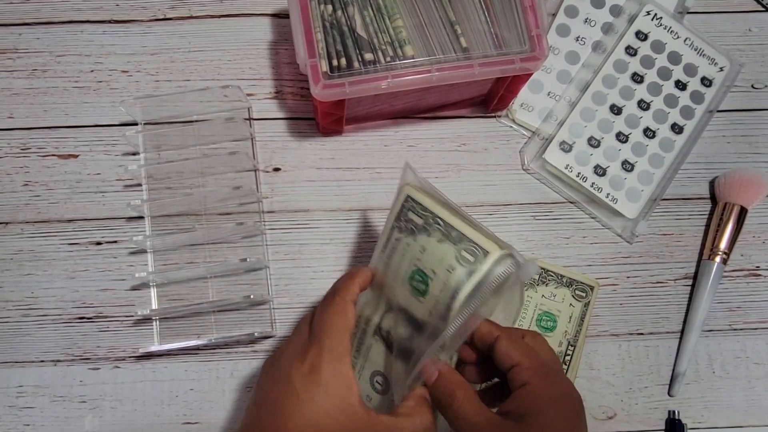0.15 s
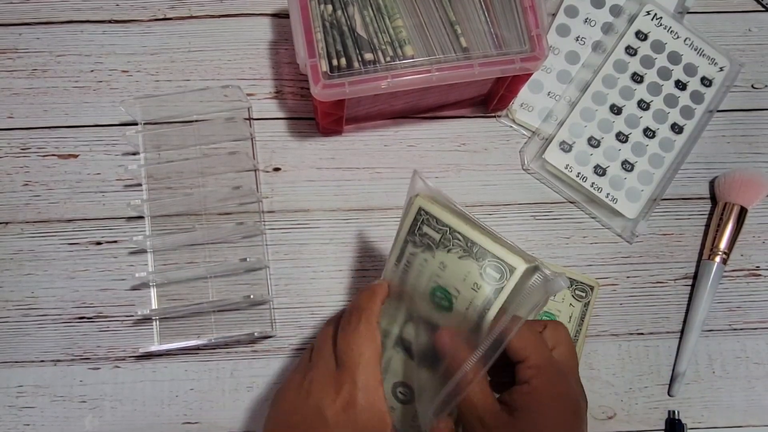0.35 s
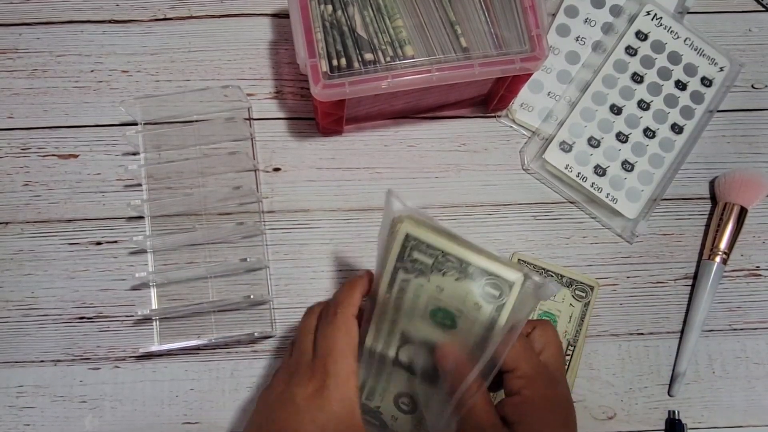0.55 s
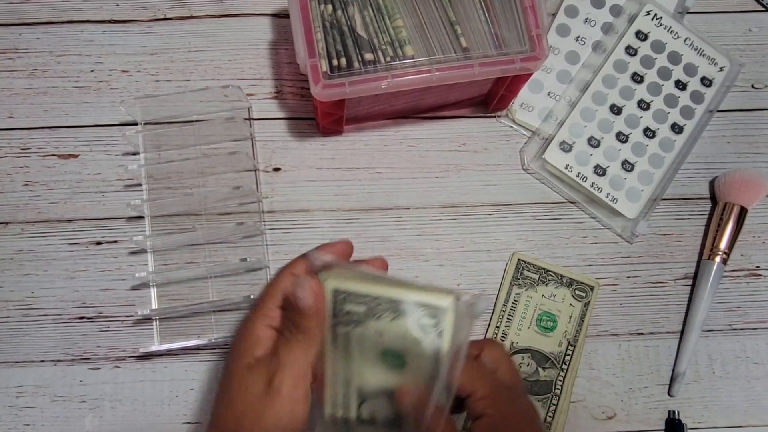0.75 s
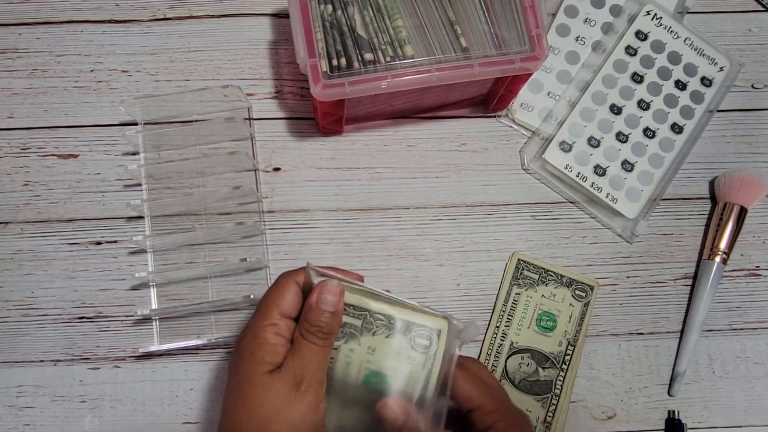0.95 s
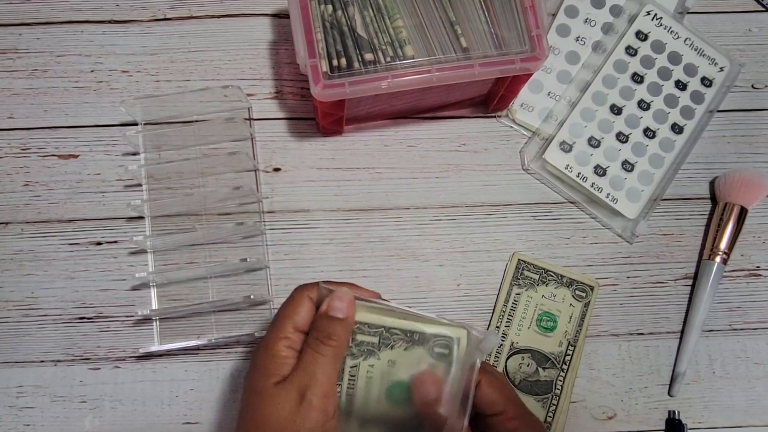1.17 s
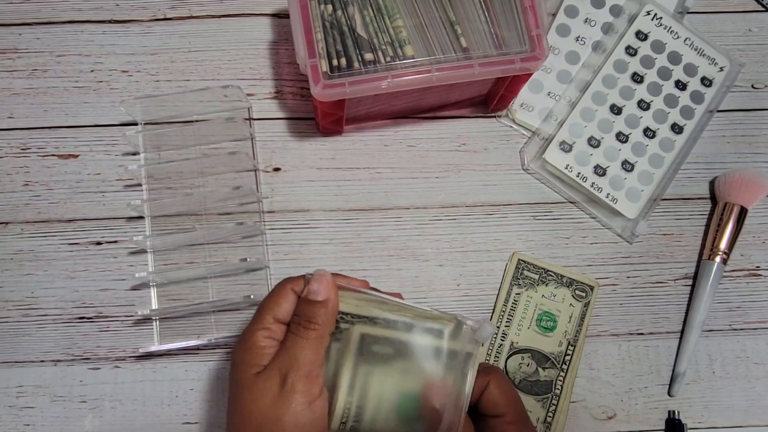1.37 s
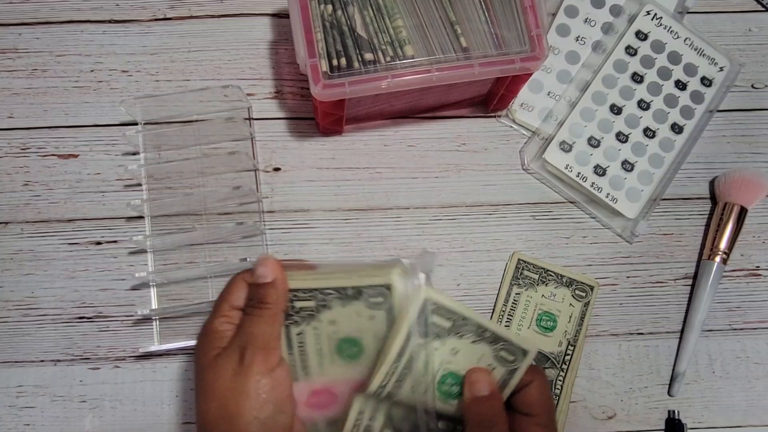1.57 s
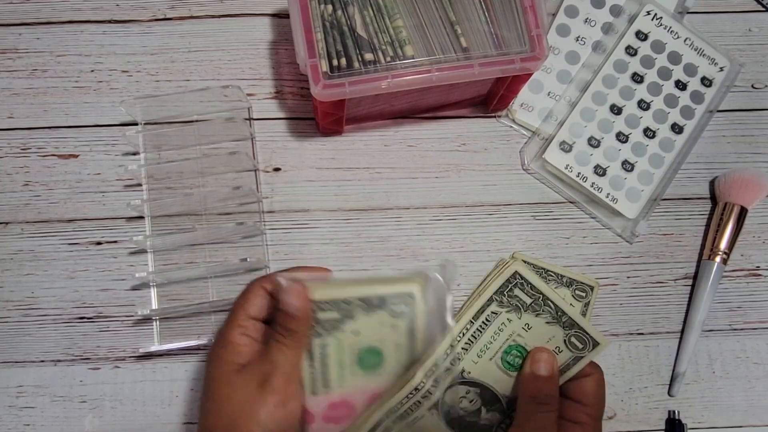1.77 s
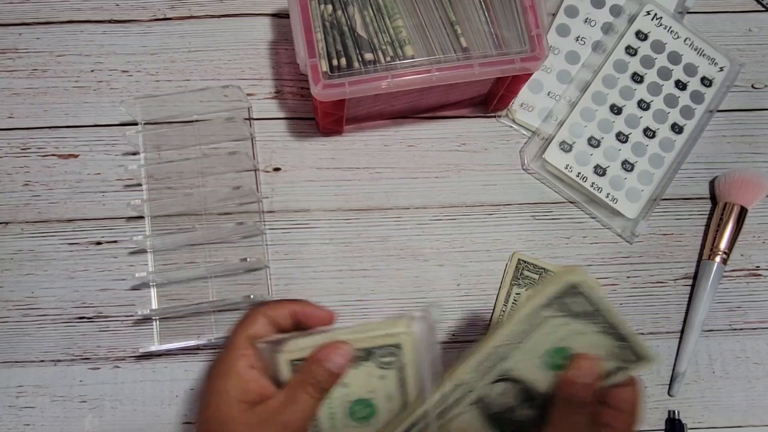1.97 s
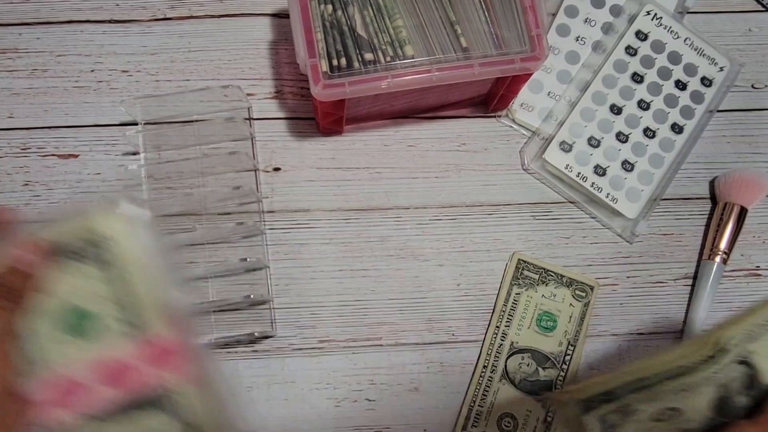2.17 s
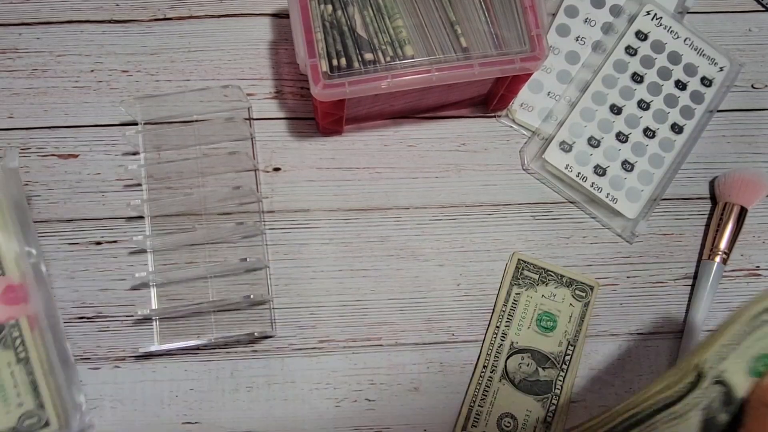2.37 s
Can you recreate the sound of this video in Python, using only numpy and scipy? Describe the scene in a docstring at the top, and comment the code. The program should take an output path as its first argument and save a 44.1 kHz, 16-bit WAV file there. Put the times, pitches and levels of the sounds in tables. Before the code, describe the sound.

Paper money being pulled from a thin plastic sleeve, with grainy swishes, sharp crackles and soft bumps.

```python
"""A low hum and faint room noise are heard first; the hum sinks slightly in pitch and grows overall.
Over them, hands open a clear plastic sleeve and draw out a stack of paper bills, just above a table.
Bills slide with a grainy hiss (gated noise and random grains); edges scrape (stick-slip resonance).
The sleeve ticks and snaps (impulses through resonances, decaying modes); the stack bumps softly
(damped knocks). A small room answers these contact sounds briefly with decaying noise."""
import sys
import numpy as np
from scipy import signal
from scipy.fft import rfft, irfft
from scipy.io import wavfile
from scipy.ndimage import uniform_filter1d

SR = 44100
rng = np.random.default_rng(int(sys.argv[2]) if len(sys.argv) > 2 else 0)


def persist_wave(psi):
    """Save psi, clipped to +-1, as 16-bit WAV."""
    counts = np.round(np.clip(psi, -1, 1) * 32767).astype(np.int16)
    wavfile.write(sys.argv[1], SR, np.atleast_2d(counts).T)


N = 106810  # samples


def undb(db):
    """Decibel law: the amplitude ratio of a level."""
    return 10 ** (np.asarray(db) / 20)


def unit(x):
    """Normalisation by mean power: all channels together reach rms 1."""
    return x / np.sqrt(np.mean(x ** 2))


def blow(x, db):
    """Energy scaling: a short sound gets the energy of this rms level held for 10 ms."""
    return x * undb(db) * np.sqrt(SR / 100 / np.sum(x ** 2))


def pan(db):
    """Interchannel level difference: gains for left minus right in dB."""
    return undb(np.array([[db], [-db]]) / 2)


def freqs(size):
    """Frequency grid of a discrete spectrum [Hz], kept at 1 Hz or above for logarithms."""
    return np.maximum(np.arange(size // 2 + 1) * SR / size, 1)


def shape(points, hz):
    """Spectral envelope: table values interpolated along log frequency."""
    f, db = np.array(points, float).T
    return np.interp(np.log(hz), np.log(np.sort(f)), db)


def tint(x, db):
    """Linear filtering: each frequency is multiplied by its own gain."""
    return irfft(rfft(x) * undb(db), x.shape[-1])


def response(db):
    """Minimum phase: folding the cepstrum makes a causal impulse response with this spectrum."""
    cepstrum = irfft(np.log(undb(db)))
    half = len(cepstrum) // 2
    folded = np.r_[cepstrum[0], 2 * cepstrum[1:half], np.zeros(half)]
    return irfft(np.exp(rfft(folded)))


def hump(hz, centre_hz, octaves):
    """Resonance curve in dB, 6 dB down at this many octaves either side of the centre."""
    distance = np.log2(hz / centre_hz) / octaves
    return -20 * np.log10(1 + distance ** 2)


def pop(decay_s, rattle_db, size=2048):
    """Impulsive excitation: a unit impulse, then noise with an exponential time constant."""
    t = np.arange(size) / SR
    x = rng.standard_normal(size) * np.exp(-t / max(decay_s, 1e-4))
    x *= undb(rattle_db) / np.sqrt(np.sum(x ** 2))
    x[0] = 1
    return x


def walk(rate):
    """Slow random modulation: about this many random values per second, smoothed, with rms 1."""
    k = int(SR / rate)
    steps = np.repeat(rng.standard_normal(N // k + 1), k)
    return unit(uniform_filter1d(steps, k)[:N])


def add(out, s, x):
    """Superposition: mixes a sound in at time s."""
    i = max(int(s * SR), 0)
    out[:, i:i + x.shape[-1]] += x[..., :N - i]


# relative spectrum of the room noise: (frequency [Hz], level [dB])
AIR_SPECTRUM = [(20, -0.5), (38, 1.5), (60, 5), (130, -1.5), (180, -14), (230, -7), (300, -14.5),
                (500, -14), (800, -22), (2000, -29.5), (3000, -29), (5000, -35.5), (6600, -31.5),
                (8800, -56.5), (15500, -48.5)]
AIR_DB = -48


def air():
    """Diffuse noise: the side signal is weak in the bass, so the noise is wider in the treble."""
    hz = freqs(N)
    mid, side = unit(tint(rng.standard_normal((2, N)), shape(AIR_SPECTRUM, hz)))
    width = shape([(100, 0.25), (1000, 1)], hz)  # amplitude ratio of side to mid
    side = tint(side, 20 * np.log10(width))
    return undb(AIR_DB) * np.array([mid + side, mid - side])


# course of the machine tone: (time [s], pitch [Hz], rms level before panning and wavering [dB])
HUM_COURSE = [(0, 68.1, -42.5), (.2, 66.9, -44.5), (.9, 66.6, -40), (1.0, 66.3, -37.5), (1.1, 65.4, -35.5),
              (1.3, 65.3, -34.5), (2.0, 65.3, -34.5), (2.42, 65.2, -36)]
MAINS_HZ, MAINS_DB, HUM_PAN_DB = 121.2, -49.5, -5


def hum():
    """Phase integration: a low machine tone follows a moving pitch; a mains line stays fixed in pitch."""
    t = np.arange(N) / SR
    s, hz, db = np.array(HUM_COURSE).T
    phase = 2 * np.pi * np.cumsum(np.interp(t, s, hz)) / SR
    drone = undb(np.interp(t, s, db) + 0.35 * walk(8.25)) * np.sin(phase)
    mains = undb(MAINS_DB + 0.46 * walk(5)) * np.sin(2 * np.pi * MAINS_HZ * t)
    return np.sqrt(2) * (drone + mains) * pan(HUM_PAN_DB)  # root 2 gives a sine rms 1


# tail and early energy are relative to the direct sound; EARLY_S is a time constant
ROOM_T60_S, ROOM_DB, EARLY_DB, EARLY_S = 0.24, -11.5, -7, 0.011


def room(x, size=16384):
    """Reverberation: early random echoes of opposite sign in the two channels widen the sound;
    a short noise tail decays."""
    t = np.arange(size) / SR
    tail = rng.standard_normal((2, size)) * undb(-60 * t / ROOM_T60_S) * (t > .005)
    early = rng.standard_normal(size) * np.exp(-t / EARLY_S) * (t > .0002)
    early = early * np.array([[1], [-1]])
    echo = (undb(ROOM_DB) * unit(tail) + undb(EARLY_DB) * unit(early)) / np.sqrt(size)
    return x + signal.fftconvolve(x, echo, axes=1)[:, :N]


# balance of the contact sounds, top treble to the right: (frequency [Hz], left minus right [dB])
SIDE_BALANCE = [(300, -1), (1200, 0), (2500, 1), (5000, -1), (8000, -2), (13000, -8)]


def shade(x):
    """Frequency-dependent level difference: half of each balance value goes to either channel."""
    return tint(x, shape(SIDE_BALANCE, freqs(N)) * np.array([[.5], [-.5]]))


# stack knocks: (time [s], level over 10 ms before panning [dB], pitch [Hz])
STACK_BUMPS = [(.5765, -47.5, 510), (.8235, -47.5, 574), (.8490, -47.5, 690), (.8512, -37.5, 493),
               (.9985, -49.5, 544), (1.0395, -38, 407), (1.0980, -45.5, 446), (1.2438, -48.5, 550),
               (1.3071, -47, 516)]
BUMP_OCTAVES, BUMP_DECAY_S, BUMP_RATTLE_DB = 0.37, 0.0096, -2


def bumps():
    """Damped impact: the stack meets fingers and table with dull knocks through one resonance."""
    hz, out = freqs(size=2048), np.zeros((2, N))
    soft = -10 * np.log10((1 + (hz / 2000) ** 2) * (1 + (220 / hz) ** 4))  # little treble or bass
    for s, db, pitch in STACK_BUMPS:
        body = response(hump(hz, pitch, BUMP_OCTAVES) + soft)
        knock = signal.fftconvolve(pop(BUMP_DECAY_S, BUMP_RATTLE_DB), body)
        add(out, s, blow(knock, db))
    return out * pan(db=-2.5)


# an edge of paper or plastic dragging and ringing its sheet:
# (start [s], length [s], level before swell and panning [dB], centre [Hz], width to -6 dB [octaves])
EDGE_SCRAPES = [(0.211, 0.041, -53.5, 1570, 0.2), (0.424, 0.046, -53, 1150, 0.35),
                (.547, 0.035, -38.5, 3110, 0.33), (0.544, 0.035, -43, 7740, 0.16),
                (0.546, 0.044, -46.5, 13000, 0.16), (.652, 0.054, -47.5, 1085, .25),
                (0.935, 0.12, -59.5, 1980, 0.16), (1.404, 0.07, -48.5, 2210, .3),
                (1.447, 0.053, -50.5, 1200, 0.19), (1.478, .06, -49.5, 3020, 0.16),
                (1.537, 0.078, -47.5, 1410, 0.24), (1.735, 0.16, -56, 1990, 0.089),
                (1.903, .024, -40.5, 2090, 0.063), (1.954, 0.018, -40.5, 2000, 0.14),
                (1.952, 0.011, -36, 3320, 0.053), (1.951, 0.024, -41.5, 5200, 0.084)]
SLIPS_PER_S, SLIP_SPREAD_DB = 900, 3


def scrapes():
    """Stick-slip: uneven pulses drive one resonance of the sheet, swelling and fading."""
    size, out = 8192, np.zeros((2, N))
    t, hz = np.arange(size) / SR, freqs(size)
    for s, length, db, centre, octaves in EDGE_SCRAPES:
        slips = rng.random(size) < SLIPS_PER_S / SR
        slips = slips * undb(SLIP_SPREAD_DB * rng.standard_normal(size))
        ring = unit(tint(slips - slips.mean(), hump(hz, centre, octaves)))
        swell = np.sin(np.pi * np.minimum(t / length, 1))
        add(out, s, undb(db) * ring * swell)
    return out * pan(db=-5.0)


# creases popping over: (time [s], level over 10 ms before panning [dB], centre [Hz],
# width to -6 dB [octaves], rattle time constant [s], left minus right [dB])
CREASE_POPS = [(0.3491, -45.5, 1210, 2.7, 0.0055, -10), (0.3597, -38, 1230, 0.57, 0.0019, -2.5),
               (0.3607, -37.5, 2600, 0.39, 0.004, -1.5), (0.3747, -54, 5540, 0.59, 0.0038, -8),
               (.4108, -52.5, 2040, 0.47, 0.0013, -3), (0.463, -46.5, 9300, .45, 0.0037, -2),
               (.5325, -52, 4630, 0.92, 0.0024, -10), (0.5472, -45, 10000, 1.1, .004, 1),
               (0.5746, -38, 8400, 0.24, 0.0048, -2), (.6780, -59, 2920, 1.3, .003, -22),
               (0.8228, -43, 1920, 1, 0.00085, 1), (0.8476, -45, 3050, 0.76, 0.0027, -12),
               (.8512, -43.5, 1620, 3.3, 0.0017, 6), (.9550, -48, 1390, 0.92, 0.0092, -3),
               (1.0857, -46.5, 5370, 0.46, 0.0013, -6), (1.097, -39, 4440, 1.04, 0.0048, -1.5),
               (1.2440, -52.5, 3050, 1.4, 0.0027, -18), (1.4, -53, 1260, 0.49, 0.0042, -7),
               (1.7049, -47, 1100, 0.66, .002, -3), (1.7144, -43.5, 2100, 1.3, 0.0033, 0),
               (1.755, -50, 2200, 1.4, .001, 5), (1.7629, -47.5, 1700, 1.3, 0.0022, -3),
               (1.8400, -49, 3900, 2, .003, -3), (1.9220, -60, 2400, 0.55, 0.0016, -5),
               (1.9558, -37.5, 3700, 1.0, 0.0033, -5), (2.2447, -49, 3550, 0.86, 0.0028, -10.5),
               (2.3700, -62.5, 9200, 1.5, 0.0055, -6)]
# colour that all crinkles share: (frequency [Hz], level [dB])
CREASE_COLOUR = [(150, 4), (500, 13.5), (1200, 19), (2000, 6.5), (2800, 8), (5500, 6), (8300, 8.5),
                 (9900, -9.5), (13000, 2.5), (16000, -7)]
CRACKLE_DB = 6  # rattle energy relative to the impulse
CONTACT_RATIO = 4.1  # a pop is 3 dB down at this multiple of its centre, from contact alone


def crinkles():
    """Buckling: each crease pops with its own resonance; a lower pop loses more treble."""
    hz, out = freqs(size=2048), np.zeros((2, N))
    for s, db, centre, octaves, decay, side in CREASE_POPS:
        contact = -10 * np.log10(1 + (hz / centre / CONTACT_RATIO) ** 4)
        body = response(shape(CREASE_COLOUR, hz) + hump(hz, centre, octaves) + contact)
        crinkle = signal.fftconvolve(pop(decay, CRACKLE_DB), body)
        add(out, s, pan(side) * blow(crinkle, db))
    return out


# the sleeve flap snapping free: (time [s], level of the ring over 10 ms before panning [dB])
FLAP_SNAPS = [(.5640, -56), (0.5691, -36), (.5754, -28.5), (0.5772, -29), (0.5798, -33), (0.5809, -36.5)]
# modes of the flap: (frequency [Hz], relative level before random spread [dB], T60 [s])
FLAP_MODES = [(480, -15.5, 0.052), (1373, -11, 0.051), (1540, -0.5, 0.0095), (1820, -10.5, 0.042),
              (1970, -6, 0.038), (2360, -17, 0.024), (2771, 5, 0.03), (3000, 0, 0.023), (3110, -8, 0.075),
              (3300, -14, .03), (3670, -3, 0.016), (7320, -13, 0.029), (8220, -8, 0.019)]
FLAP_CRACK_DB = -5  # crack relative to the ring


def flap():
    """Modal excitation: the stiff flap slips past the stack in cracks that ring its modes."""
    t, hz, out = np.arange(SR // 5) / SR, freqs(size=2048), np.zeros((2, N))
    body = response(hump(hz, centre_hz=2480, octaves=1.0) - 10 * np.log10(1 + (hz / 4000) ** 8))
    for s, db in FLAP_SNAPS:
        ring = np.zeros(len(t))
        for f, level, t60 in FLAP_MODES:
            level_chance, phase_chance = rng.standard_normal(2)
            tone = np.sin(2 * np.pi * f * t + 2 * phase_chance)
            ring += undb(level + level_chance) * tone * undb(-60 * t / t60)
        add(out, s, blow(ring, db))
        crack = signal.fftconvolve(pop(decay_s=0.0043, rattle_db=3.5), body)
        add(out, s, blow(crack, db + FLAP_CRACK_DB))
    return out * pan(db=-1.0)


FLEX_DB, FLEX_PER_S = 2.2, 28  # rms swing in each band, random values per second


def flex(x):
    """Band modulation: as the sheets bend, narrow bands of their hiss swell and fade on their own."""
    octave, out = np.log2(np.clip(freqs(N), 500, 16000) / 500), 0
    spectrum = rfft(x)
    for k in range(16):  # overlapping third-octave triangles that sum to 1
        band = irfft(spectrum * np.maximum(1 - np.abs(3 * octave - k), 0), N)
        out = out + band * undb(FLEX_DB * walk(FLEX_PER_S))
    return out


# slides of paper and plastic: (start [s], rise [s], hold [s], fall [s],
# mid level before panning and wavering [dB], tilt above 400 Hz [dB per octave], left minus right [dB])
SHEET_SLIDES = [(0.0, .02, 0.044, 0.087, -74, -5, -13), (0.179, 0.042, 0.029, 0.069, -51.5, -1.0, 0.5),
                (0.367, 0.041, 0.035, 0.19, -54, -2, -2), (0.538, 0.012, 0.029, 0.019, -46, -0.5, -4.5),
                (.645, 0.047, 0.033, 0.051, -47.5, 4.5, -2.5), (0.754, 0.06, 0.059, 0.042, -48, -2.7, -2),
                (0.864, 0.046, 0.068, 0.095, -55, -0.5, -2),
                (1.078, 0.0078, 0.012, 0.05, -49.5, -5.5, -8.5),
                (1.17, 0.052, 0.021, 0.19, -51.5, -2.5, -1), (1.385, 0.051, 0.051, 0.072, -47, -3, -0.5),
                (1.447, .10, 0.07, 0.073, -44.5, 2.05, -1.5), (1.618, 0.083, .14, 0.098, -51, -.8, -2.5),
                (1.879, 0.051, 0.04, 0.028, -42.5, 1, -4), (1.917, 0.039, 0.018, 0.073, -44.5, 6.5, -0.5),
                (2.131, 0.023, 0.017, 0.14, -60, -2.2, 1)]
# spectrum of sliding paper before tilt: (frequency [Hz], level [dB])
PAPER_SPECTRUM = [(120, -4), (450, 0.5), (780, -6.5), (1050, 5), (1400, 3.5), (1750, 2.5), (3100, 3.5),
                  (5000, 0), (7600, -1), (9600, -16), (13000, -15.5), (16000, -27)]
GRAINS_PER_S, GRAIN_SPREAD_DB, GRAIN_DB = 1300, 0.5, -1  # GRAIN_DB is relative to the hiss
GRIP_PER_S, GRIP_DB = 54.57, 0.8  # random values per second, rms swing
SLIDE_WIDTH = 0.64  # amplitude ratio of side to mid


def slides():
    """Friction: fibres catch and slip as dense grains in a hiss, while the grip wavers."""
    t, hz, out = np.arange(N) / SR, freqs(N), np.zeros((2, N))
    for start, rise, hold, fall, db, bright, side in SHEET_SLIDES:
        catches = rng.random((2, N)) < GRAINS_PER_S / SR
        signs = rng.choice([-1, 1], (2, N))
        strength = undb(GRAIN_SPREAD_DB * np.minimum(rng.exponential(size=(2, N)), 4))
        grains = catches * signs * strength
        rub = rng.standard_normal((2, N)) + undb(GRAIN_DB) * unit(grains)
        colour = shape(PAPER_SPECTRUM, hz) + bright * np.log2(np.maximum(hz, 400))
        mid, wide = unit(tint(rub, colour))
        stereo = np.array([mid + SLIDE_WIDTH * wide, mid - SLIDE_WIDTH * wide])
        push = np.interp(t, start + np.cumsum([0, rise, hold, fall]), [0, 1, 1, 0])
        out += undb(db) * push * pan(side) * stereo
    return out * undb(GRIP_DB * walk(GRIP_PER_S))


def scene():
    """Superposition: contact sounds in the room, over hum and air."""
    contacts = bumps() + scrapes() + crinkles() + flap() + flex(slides())
    return air() + hum() + shade(room(contacts))


TOP_HZ = 15900


def record(dry):
    """Band limiting: a steep elliptic low-pass (0.2 dB ripple, 80 dB stopband) cuts the top."""
    return signal.sosfilt(signal.ellip(10, .2, 80, TOP_HZ, fs=SR, output="sos"), dry)


dry = scene()
out = record(dry)
persist_wave(out)
```